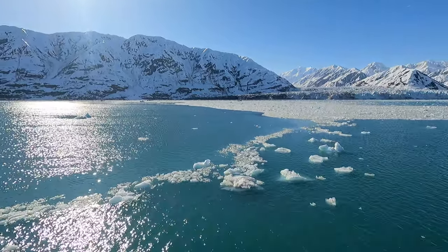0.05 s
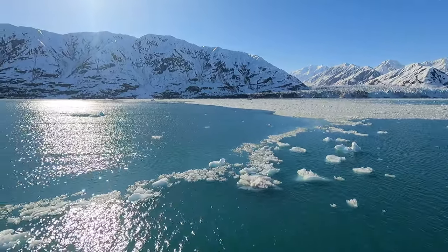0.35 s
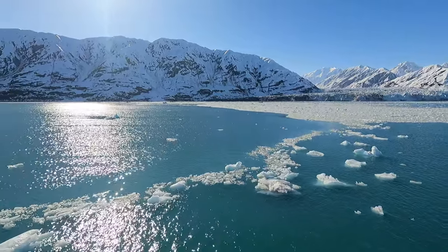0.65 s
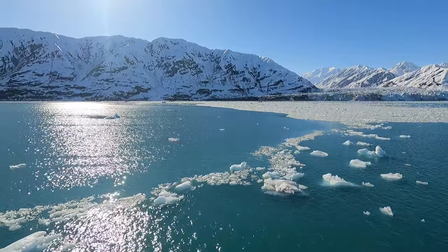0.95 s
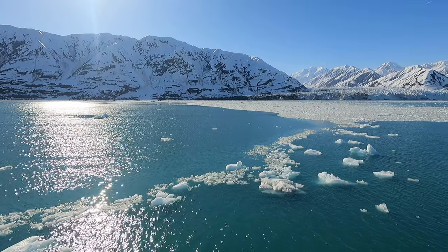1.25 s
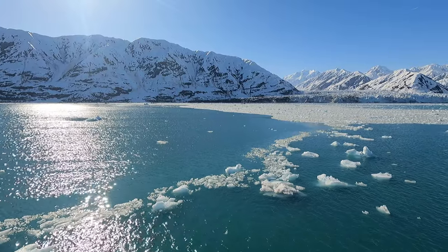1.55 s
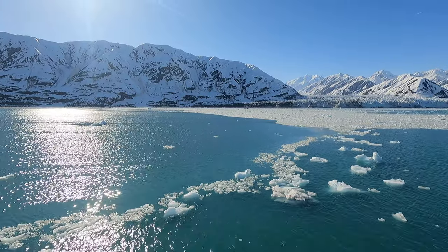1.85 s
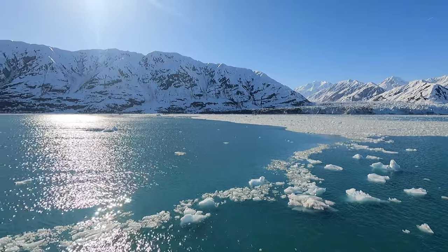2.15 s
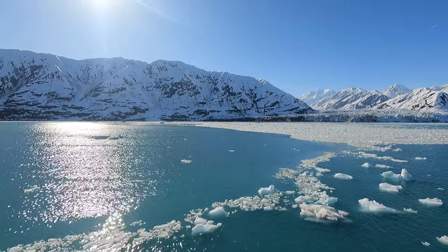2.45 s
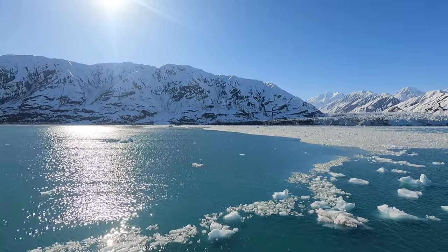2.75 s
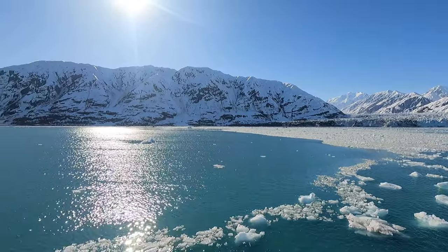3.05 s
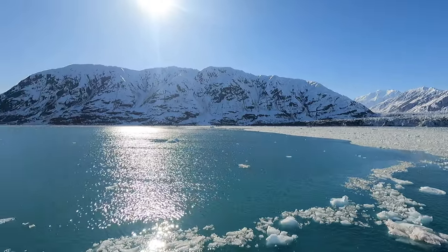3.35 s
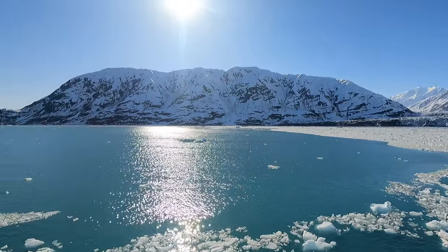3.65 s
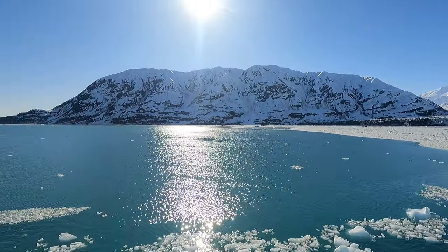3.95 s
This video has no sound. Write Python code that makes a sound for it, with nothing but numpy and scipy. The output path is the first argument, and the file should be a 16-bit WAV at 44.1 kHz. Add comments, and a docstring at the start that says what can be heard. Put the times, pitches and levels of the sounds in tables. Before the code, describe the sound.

A ship's engine drones and rumbles steadily, heard on deck in calm, icy water. Wind buffets and hisses on the microphone, drops away midway, then returns. Water washes softly along the hull, with faint ticks and bumps of ice.

```python
"""Two deep ship engine drones beat over a steady rumble, heard on deck in calm, ice-strewn water.
Water washes along the hull; bits of ice tick and bump.
Wind buffets and hisses on the microphone, drops to a lull that narrows the sound to the centre, and returns.
Drones are sine harmonics, rumble, water and wind are fluttering noise bands, ice is short noise bursts."""
import sys
import numpy as np
from scipy import signal
from scipy.io import wavfile
from scipy.ndimage import uniform_filter1d, minimum_filter1d

SR = 44100
rng = np.random.default_rng(int(sys.argv[2]) if len(sys.argv) > 2 else 0)


def digitize_waveform(pressure):
    """Quantize a signal to 16-bit integers and store it at the path in sys.argv[1].

    Rows of a 2-D input are taken as channels; values are limited to [-1, 1].
    """
    field = np.atleast_2d(pressure).T
    bounded = np.clip(field, -1, 1)
    quanta = np.round(bounded * 32767).astype(np.int16)
    wavfile.write(sys.argv[1], SR, quanta)


N = 176400
T = np.arange(N) / SR
CUTOFF_HZ = 15700


def from_db(db):
    """Decibels to gain."""
    return 10 ** (np.asarray(db) / 20)


def unit_rms(x):
    """Scale to rms 1."""
    return x / np.sqrt(np.mean(x ** 2) + 1e-20)


def in_time(rows):
    """Interpolate (time_s, value) rows at every sample."""
    return np.interp(T, *np.transpose(rows))


def at_hz(rows, hz):
    """Interpolate (freq_hz, value) rows on a log-frequency axis."""
    freqs_hz, values = np.transpose(rows)
    return np.interp(np.log(hz), np.log(freqs_hz), values)


def pan(left_minus_right_db):
    """Left and right gains."""
    return from_db(np.array([[left_minus_right_db], [-left_minus_right_db]]) / 2)


def drift(rate_hz):
    """Slow random motion, rms 1."""
    hop, settle = 40, 2000
    pole = np.exp(-2 * np.pi * rate_hz * hop / SR)
    white = rng.standard_normal(N // hop + settle + 2)
    slow = signal.lfilter([1], [1, -2 * pole, pole * pole], white)[settle:]
    return np.interp(np.arange(N) / hop, np.arange(len(slow)), unit_rms(slow))


def drone(hz, levels_db, waver_db, wander_rad):
    """Harmonics of a turning shaft, wavering slightly in level and speed."""
    in_phase_s = .115
    phase = 2 * np.pi * hz * (T - in_phase_s) + wander_rad * drift(1)
    return np.sqrt(2) * sum(from_db(db + waver_db * drift(1.4)) * np.sin(k * phase)
                            for k, db in enumerate(levels_db, 1))


def turbulence(spectrum, shared_db, own_db, rate_hz, correlation=None, pans=None,
               tilt_db_per_oct=0, pivot_hz=1000):
    """Third-octave noise bands fluttering together and singly; mono unless given a correlation."""
    edges_hz = 14 * 2 ** (np.arange(32) / 3)
    white = rng.standard_normal((2, 2 if correlation else 1, N + SR // 2))
    out, power, shared = 0, 0, drift(rate_hz)
    for k, (low, high) in enumerate(zip(edges_hz, edges_hz[1:])):
        if high < spectrum[0][0] or low > spectrum[-1][0]:
            continue
        hz = np.sqrt(low * high)
        bandpass = signal.butter(3, [low, high], "band", fs=SR, output="sos")
        band = signal.sosfilt(bandpass, white[k % 2])[:, -N:]
        if correlation:
            alike = np.clip(at_hz(correlation, hz), -1, 1)
            mid, side = np.sqrt(1 + alike) * band[0], np.sqrt(1 - alike) * band[1]
            band = np.array([mid + side, mid - side]) * pan(at_hz(pans, hz))
        band = band * from_db(at_hz(spectrum, hz) + shared_db * shared + own_db * drift(rate_hz))
        power += np.mean(band ** 2)
        out = out + band * from_db(tilt_db_per_oct * np.log2(hz / pivot_hz))
    return out / np.sqrt(power)


def bursts(rows, width_ratio, attack_s, pan_db, lowpass_ratio):
    """Decaying noise bursts, each with one broad resonance; ratios are to its pitch."""
    out, age_s = np.zeros(N), np.arange(SR // 2) / SR
    for start_s, level_db, pitch_hz, t60_s in rows:
        resonance = signal.iirpeak(pitch_hz, max(1 / width_ratio, .7), fs=SR)
        lowpass = signal.butter(4, min(lowpass_ratio * pitch_hz, CUTOFF_HZ), fs=SR, output="sos")
        body = signal.sosfilt(lowpass, signal.lfilter(*resonance, rng.standard_normal(len(age_s))))
        envelope = from_db(level_db - 60 * age_s / t60_s) * (1 - np.exp(-age_s / attack_s))
        burst = envelope * unit_rms(body) / 2
        start = int(start_s * SR)
        out[start:start + len(burst)] += burst[:N - start]
    return out * pan(pan_db)


# Engine A fundamental: time_s, level_db
ENGINE_A_LEVEL = [(0, -21.7), (2.3, -22.8), (4, -23.5)]
# Engine A overtones: time_s, second_db, third_db, fourth_db
ENGINE_A_OVERTONES = [(0.3, -28, -46.5, -52), (.8, -48, -38.5, -48.5), (1.9, -37.5, -34, -36.5),
                      (2.6, -39, -33, -37), (4, -37.5, -31.5, -43.5)]
# Engine B fundamental: time_s, level_db
ENGINE_B_LEVEL = [(0.4, -22.7), (1.9, -24), (2.5, -21), (4, -20)]
# Generator harmonics: first_db, second_db
GENERATOR_DB = [-36.5, -38.5]
# Machinery whines: pitch_hz, level_db
WHINES = [(522, -67), (678, -65)]


def engines():
    """Two beating engine drones, a generator hum and faint whines."""
    overtones_db = [in_time([(row[0], row[k]) for row in ENGINE_A_OVERTONES]) for k in (1, 2, 3)]
    fifth_db = -48
    harmonics_db = [in_time(ENGINE_A_LEVEL), *overtones_db, fifth_db]
    engine_a = drone(hz=32.2, levels_db=harmonics_db, waver_db=0.17, wander_rad=0.013)
    engine_b = drone(hz=39.65, levels_db=[in_time(ENGINE_B_LEVEL)], waver_db=1.5, wander_rad=0.017)
    generator = drone(hz=60.0, levels_db=GENERATOR_DB, waver_db=0.25, wander_rad=0.083)
    whines = sum(drone(hz, [db], waver_db=2.0, wander_rad=2.6) for hz, db in WHINES)
    return engine_a + engine_b + generator + whines


# Rumble envelope: time_s, level_db
RUMBLE_LEVEL = [(0, -24.5), (.5, -26), (1.1, -25), (2.3, -25.5), (2.8, -27), (3.4, -27), (4, -24.5)]
# Rumble spectrum: freq_hz, density_db
RUMBLE_SPECTRUM = [(16, -11), (30, 2), (65, 2.5), (85, 0), (125, -5), (160, -7.5), (280, -20.5), (400, -28),
                   (700, -48)]


def rumble():
    """Broad low roar of machinery and exhaust."""
    roar = turbulence(RUMBLE_SPECTRUM, shared_db=1.02, own_db=0.98, rate_hz=3.1)
    return from_db(in_time(RUMBLE_LEVEL)) * roar


# Wash envelope: time_s, level_db
WASH_LEVEL = [(0, -48), (.9, -52.5), (1.2, -53), (1.45, -46), (2.05, -43), (2.8, -46), (3.7, -49), (4, -45)]
# Wash spectrum: freq_hz, density_db
WASH_SPECTRUM = [(150, 1.5), (350, 6), (600, 7.5), (820, 1), (1050, 0.5), (1550, -6.5), (2000, -15),
                 (3200, -23.5), (4500, -33.5), (7500, -51.5)]


def hull_wash():
    """Smooth rush of water along the hull."""
    rush = turbulence(WASH_SPECTRUM, shared_db=0.0, own_db=1.02, rate_hz=12)
    return from_db(in_time(WASH_LEVEL)) * rush


# Gust envelope: time_s, level_db
WIND_LEVEL = [(0, -38.5), (.45, -29), (.65, -36), (.88, -27), (1.1, -32.5), (1.6, -35.5), (2.3, -81),
              (2.62, -48), (3.05, -32.5), (3.3, -32), (3.65, -35), (4, -26)]
# Wind spectrum: freq_hz, density_db
WIND_SPECTRUM = [(16, -4.5), (65, 2), (110, -5.5), (180, -3), (280, -10), (420, -22.5), (800, -28),
                 (1600, -49.5)]
# Wind left-right likeness: freq_hz, correlation
WIND_CORRELATION = [(40, 0.1), (500, 0.12)]
# Wind balance: freq_hz, left_minus_right_db
WIND_PAN = [(30, 5.5), (80, 4.5), (170, -6.5), (350, -7.5), (900, -6)]
# Wind brightness: time_s, tilt_db_per_oct
WIND_TILT = [(0, -2), (.7, -2.5), (1.4, 0.5), (2.9, 1), (4, 0.5)]


def wind_buffets():
    """Wind buffets each microphone port differently: deep bass to the left, the rest to the right."""
    buffets = turbulence(WIND_SPECTRUM, shared_db=3.0, own_db=3.0, rate_hz=20,
                         correlation=WIND_CORRELATION, pans=WIND_PAN,
                         tilt_db_per_oct=in_time(WIND_TILT), pivot_hz=115)
    return from_db(in_time(WIND_LEVEL)) * buffets


# Click strength: freq_hz, gain_db
CRACKLE_GAINS = [(2000, 10.5), (4000, 7), (7500, -4), (11000, -15)]


def crackle(clicks_per_s=1500, spread_db=3.0, q=3):
    """Fine crackle: random clicks in 12 bands, rms 1."""
    pitches_hz = np.geomspace(CRACKLE_GAINS[0][0], CRACKLE_GAINS[-1][0], num=12)
    out = 0
    for hz in pitches_hz:
        onsets = np.flatnonzero(rng.random(N) < clicks_per_s / len(pitches_hz) / SR)
        size_db = spread_db * np.minimum(rng.exponential(1, len(onsets)), 4) + at_hz(CRACKLE_GAINS, hz)
        polarity = rng.choice([-1, 1], len(onsets))
        side_db = np.outer([1, -1], rng.normal(1, 3, len(onsets)))
        clicks = np.zeros((2, N))
        clicks[:, onsets] = polarity * from_db(size_db + side_db)
        edges_hz = np.minimum(hz * np.exp(np.array([-.5, .5]) / q), CUTOFF_HZ)
        bandpass = signal.butter(2, edges_hz, "band", fs=SR, output="sos")
        out = out + signal.sosfilt(bandpass, clicks + 1e-18)
    return unit_rms(out)


# Hiss envelope: time_s, level_db
HISS_LEVEL = [(0, -48.5), (.3, -49), (.49, -47), (.62, -49.5), (.96, -48.5), (1.15, -56.5), (1.45, -62),
              (1.8, -71), (2.55, -71.5), (2.8, -61), (3.22, -52.5), (3.42, -55), (3.78, -55), (4, -55.5)]
# Hiss spectrum: freq_hz, density_db
HISS_SPECTRUM = [(400, -9), (900, 5.5), (1600, 2.5), (2200, -4), (3400, -6.5), (5000, -11), (7600, -16.5),
                 (9500, -30), (14000, -47)]
# Hiss left-right likeness: freq_hz, correlation
HISS_CORRELATION = [(1000, 0.9), (2500, 0.6), (5000, 0.23), (10000, 0.15)]
# Hiss balance: freq_hz, left_minus_right_db
HISS_PAN = [(900, 0.5), (3000, 3), (11000, 2.5)]
# Hiss brightness: time_s, tilt_db_per_oct
HISS_TILT = [(0, -1), (.5, -0.3), (.85, -3), (1.2, -0.7), (3.1, -1.4), (4, 0.5)]


def wind_hiss():
    """Air streaming past hisses; the share of crackle grows with the gusts."""
    air = turbulence(HISS_SPECTRUM, shared_db=1.73, own_db=1.35, rate_hz=22,
                     correlation=HISS_CORRELATION, pans=HISS_PAN,
                     tilt_db_per_oct=in_time(HISS_TILT), pivot_hz=1960)
    level_db = in_time(HISS_LEVEL)
    crackle_share_db = -13.5 + 0.3 * (level_db - level_db.max())
    return from_db(level_db) * (air + from_db(crackle_share_db) * crackle())


# Treble spits: start_s, level_db, t60_s
SPITS = [(.131, -47, 0.013), (.2035, -48, .01), (.2813, -45, .007), (0.9294, -47, 0.011),
         (1.5265, -57, .008), (1.951, -72, .07), (2.095, -73.5, 0.064), (2.22, -71.5, .08),
         (2.379, -68, 0.056), (2.84, -66, .007), (3.1516, -61, .015), (3.2414, -59, .02)]


def spits(pitch_hz=7500):
    """Crisp little spits of treble."""
    rows = [(start_s, level_db, pitch_hz, t60_s) for start_s, level_db, t60_s in SPITS]
    return bursts(rows, width_ratio=.6, attack_s=.0002, pan_db=3.0, lowpass_ratio=1.5)


# Dull ice bumps: start_s, level_db, pitch_hz, t60_s
ICE_BUMPS = [(.245, -32, 950, 0.17), (2.505, -31, 648, 0.18), (3.285, -37, 950, .08)]
# Ice ticks: start_s, level_db, pitch_hz, t60_s
ICE_TICKS = [(.359, -38.5, 3940, 0.044), (.525, -45, 5540, 0.047), (1.069, -38, 3300, .015),
             (1.264, -49, 3700, 0.048), (1.701, -52, 3330, 0.11), (2.072, -48.5, 3220, 0.069),
             (2.483, -40.5, 4740, 0.018), (2.903, -49, 4600, 0.036)]


def ice():
    """Bits of ice knock: bright ticks and dull bumps."""
    ticks = bursts(ICE_TICKS, width_ratio=0.36, attack_s=0.0014, pan_db=1.5, lowpass_ratio=1.05)
    bumps = bursts(ICE_BUMPS, width_ratio=0.22, attack_s=0.0077, pan_db=-3.0, lowpass_ratio=2.1)
    return ticks + bumps


# Eddies: start_s, level_db, pitch_hz, t60_s
EDDY_FLAPS = [(.85, -27.5, 188, 0.48), (1.306, -36.5, 597, 0.056), (3.638, -31, 644, 0.048),
              (3.76, -35, 600, 0.074), (3.808, -31.5, 455, 0.088), (3.96, -30, 480, 0.18)]


def eddy_flaps():
    """Single eddies flap on the right microphone port."""
    return bursts(EDDY_FLAPS, width_ratio=0.62, attack_s=0.0039, pan_db=-17, lowpass_ratio=1.56)


# Low booms: centre_s, level_db, pitch_hz
BOOMS = [(1.48, -29.5, 122), (2.071, -26, 86), (2.219, -35, 198), (2.68, -27.5, 106.5), (3.13, -26.5, 95)]


def booms(swell_s=.1):
    """Single low pitches swell out of the rumble and sink back."""
    out = 0
    for centre_s, level_db, pitch_hz in BOOMS:
        envelope = from_db(level_db) * np.exp(-((T - centre_s) / swell_s) ** 2)
        phase = 2 * np.pi * (pitch_hz * T + rng.random()) + drift(10)
        out = out + envelope * np.sqrt(2) * np.sin(phase)
    return out


def scene():
    """Ship, water and ice near the centre, wind on either side."""
    transients = ice() + eddy_flaps() + spits()
    ship = engines() + rumble() + booms()
    return transients + ship + hull_wash() + wind_buffets() + wind_hiss()


def record(dry, ceiling_db=-10, window_s=.02):
    """Smooth peak limiter, then a steep low-pass."""
    window = int(window_s * SR)
    gain = np.minimum(1, from_db(ceiling_db) / (np.abs(dry).max(axis=0) + 1e-9))
    gain = uniform_filter1d(minimum_filter1d(gain, window), window)
    lowpass = signal.cheby2(12, 70, CUTOFF_HZ, fs=SR, output="sos")
    return signal.sosfilt(lowpass, dry * gain)


dry = scene()
out = record(dry)
digitize_waveform(out)
```